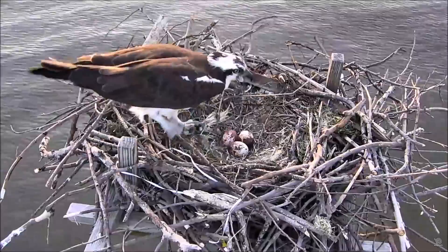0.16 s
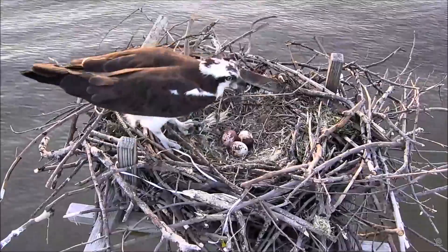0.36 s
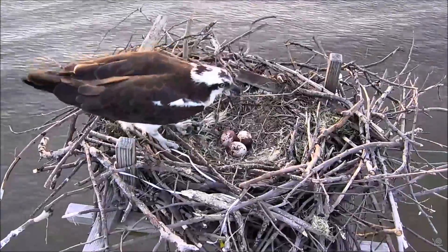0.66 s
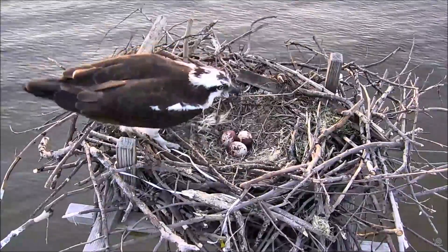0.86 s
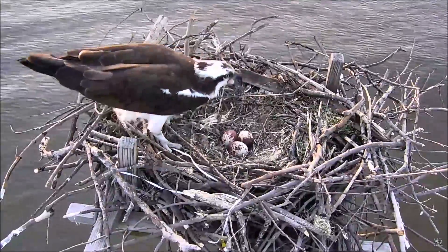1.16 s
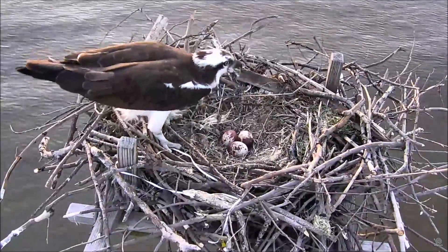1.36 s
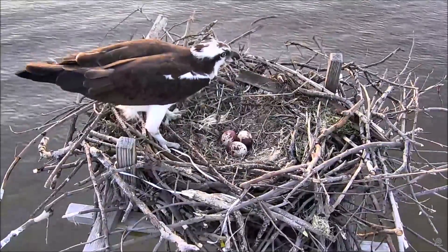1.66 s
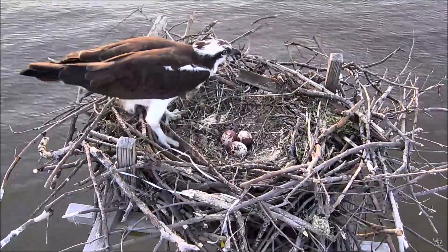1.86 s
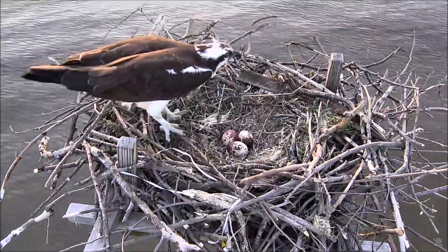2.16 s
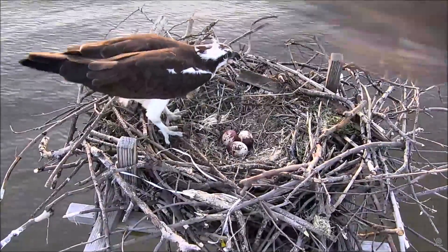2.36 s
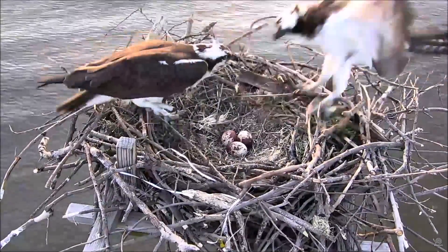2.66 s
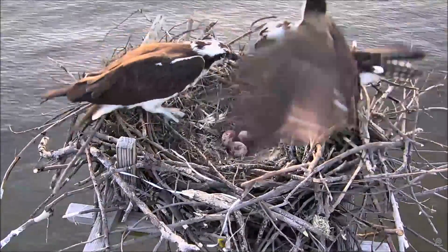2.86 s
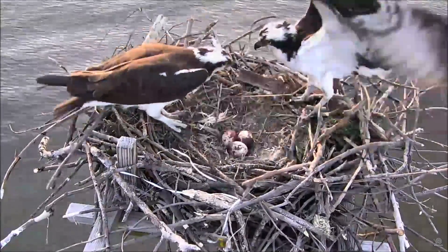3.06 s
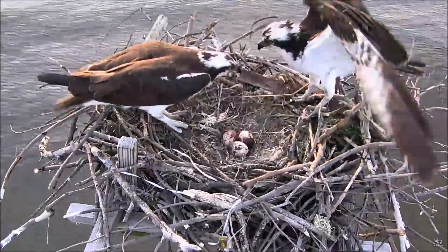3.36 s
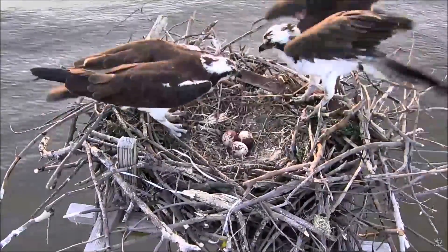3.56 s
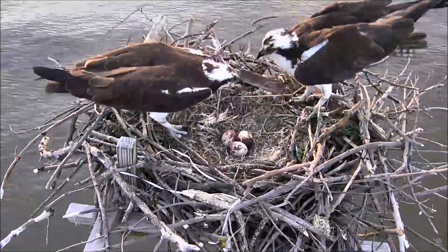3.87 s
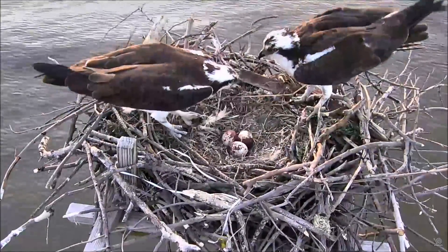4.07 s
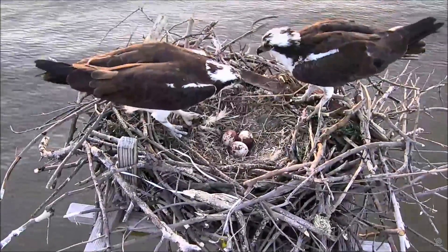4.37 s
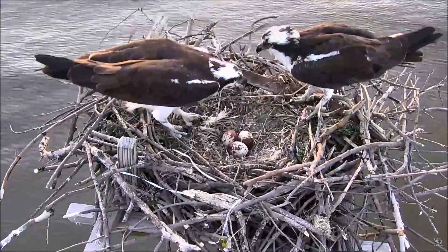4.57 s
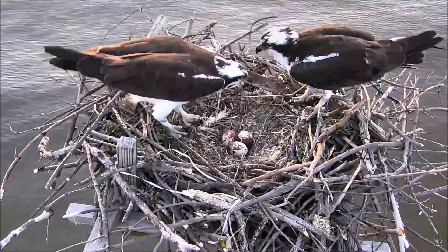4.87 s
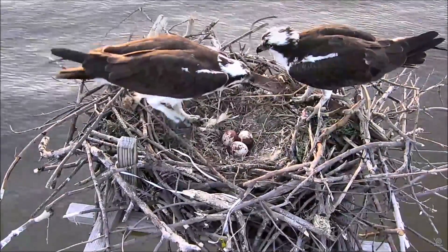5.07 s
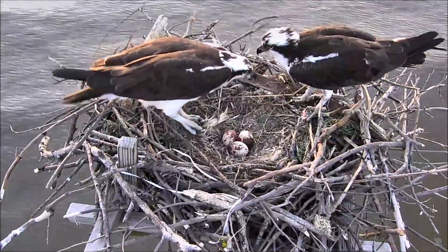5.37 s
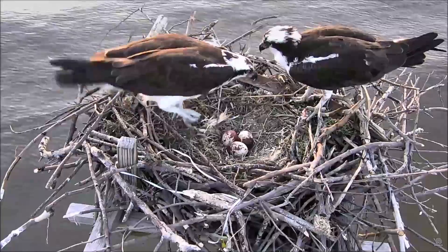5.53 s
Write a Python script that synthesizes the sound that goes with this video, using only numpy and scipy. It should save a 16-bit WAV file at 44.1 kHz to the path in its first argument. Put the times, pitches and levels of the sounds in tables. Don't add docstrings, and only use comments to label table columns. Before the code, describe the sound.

Close, dry outdoor sound at an osprey's stick nest over water. From 0 s the bird whistles piercing chirps about every quarter second: a short level note near 3 kHz, a sagging gap, then a loud sweep down from above 4 kHz and a low, croaky tail. Around 1.5 s the voice turns raspy, and from 1.9 s chirps start with a rising note and flip between registers. Soft feather scraping stirs from about 1.8 to 3 s as the mate flaps in and lands, with a clear twig snap at 2.1 s. From roughly 3.2 s the calls lengthen and slow, calmer and slurred after 3.7 s, held notes edged with airy wheeze, the last at 5.3-5.6 s. A sharp twig snap comes at 5.16 s. Very faint breeze and distant engine hum lie underneath. The small microphone overloads brightly on the loudest notes; brief moments sound thinned and smeared.

```python
import sys
import numpy as np
from scipy import signal
from scipy.fft import rfft, irfft, next_fast_len
from scipy.io import wavfile
from scipy.ndimage import uniform_filter1d, minimum_filter1d, map_coordinates

SR = 44100
rng = np.random.default_rng(int(sys.argv[2]) if len(sys.argv) > 2 else 0)


def wav_out(sig):
    wavfile.write(sys.argv[1], SR, np.round(np.clip(np.atleast_2d(sig).T, -1, 1) * 32767).astype(np.int16))


def undo_db(level):
    steps = np.asarray(level, float) / 20
    return 10 ** steps


N = 251370
CALMER_S = 3.7


def unit(x):
    return x / np.sqrt(np.mean(x ** 2) + 1e-20)


def coloured(x, points):
    m = next_fast_len(N + 8192)
    hz, db = np.transpose(points)
    f = np.fft.rfftfreq(m, 1 / SR)
    gain = undo_db(np.interp(np.log(f + 1), np.log(hz), db))
    return irfft(rfft(x, m) * gain, m)[:N]


def resonate(x, resonances):
    f = np.fft.rfftfreq(N, 1 / SR)
    gain = sum(undo_db(db) / (1 + (2 * (f - hz) / wide) ** 2) for hz, wide, db in resonances)
    return irfft(rfft(x) * gain, N)


def wobble(rate):
    points = rng.standard_normal(int(N * rate / SR) + 4)
    return map_coordinates(points, [np.arange(N) * rate / SR])


def breeze_and_hum():
    # (frequency [Hz], level [dB])
    colour = [(35, -72.5), (60, -34.5), (164, -17.5), (230, -10), (425, -6), (663, -8), (799, -6.5),
              (1500, -19), (1720, -12), (1890, -15), (7850, -28), (15800, -23)]
    # (time [s], level [dB])
    gusts = [(0, -85), (.9, -85), (1.1, -82.5), (1.4, -83.5), (1.7, -85), (2.1, -82.5), (2.8, -83),
             (3.05, -85), (3.9, -82.5), (4.3, -85), (5.05, -83), (5.3, -85.5), (5.7, -84)]
    # (frequency [Hz], level [dB])
    engine = [(274.5, -99), (344.5, -96.5), (409.1, -96)]
    t = np.arange(N) / SR
    hum = 0
    for hz, db in engine:
        level = undo_db(db + 3.5 + 1.2 * wobble(3.4))
        hum = hum + level * np.sin(2 * np.pi * hz * t + wobble(5.9))
    gust_db = np.interp(t, *np.transpose(gusts))
    level = undo_db(gust_db + 1.5 + 1.5 * wobble(5.5) + 1.9 * wobble(15))
    return level * unit(coloured(rng.standard_normal(N), colour)) + hum


def nest():
    # (time [s], level [dB])
    stirring = [(0.0, -90.5), (0.42, -77.5), (.7, -82.5), (1.36, -83), (1.65, -84), (1.78, -73.5),
                (1.9, -80.5), (2.05, -70.5), (2.16, -75.5), (2.38, -73), (2.66, -71.5), (2.93, -73),
                (3.17, -82.5), (3.7, -83.5), (4.9, -87), (5.7, -88.5)]
    # (frequency [Hz], level [dB])
    colour = [(710, -37), (1200, -11.5), (3060, -7.5), (3210, -6), (3850, -8.5), (5290, -2.5), (12000, -27),
              (15600, -60), (22000, -120)]
    # (time [s], peak [dB], pitch [Hz], time to fall 60 dB [s])
    ticks = [
        (0.4176, -52, 5040, 0.014),
        (0.6728, -62, 4002, .011),
        (2.104, -39.5, 4940, .011),
        (2.1106, -46, 5490, 0.013),
        (2.1321, -54, 5530, .011),
        (2.9379, -57, 5840, 0.0095),
        (3.937, -65, 6070, .008),
        (5.1625, -35, 4800, 0.006),
        (5.1635, -39, 6400, .006),
    ]
    grain = undo_db(2.8 * wobble(30) + 2.2 * wobble(300))
    scrape = unit(coloured(unit(grain) * rng.standard_normal(N), colour))
    stir_db = np.interp(np.arange(N) / SR, *np.transpose(stirring)) + 2
    out = np.pad(undo_db(stir_db) * scrape, (0, 900))
    t = np.arange(900) / SR
    for s, db, hz, t60 in ticks:
        level = undo_db(db - 60 * t / t60) * (1 - np.exp(-t / 0.00015))
        ring = np.sin(2 * np.pi * hz * t) + 0.06 * rng.standard_normal(900)
        out[round(s * SR):][:900] += level * ring
    return out[:N]


def wheeze():
    # (start [s], end [s], level [dB])
    wheezes = [(3.49, 3.64, -68), (3.755, 3.8, -65), (3.82, 3.9, -62), (4.03, 4.07, -65), (4.09, 4.17, -63),
               (4.305, 4.495, -62.5), (4.64, 4.765, -63.5), (4.99, 5.09, -69), (5.09, 5.175, -64),
               (5.335, 5.38, -66), (5.43, 5.53, -66)]
    # (centre [Hz], width [Hz], level [dB])
    bands = [(2170, 260, -5), (3050, 300, -1), (3700, 400, -4), (4350, 300, -2), (4750, 200, -9),
             (5130, 300, -1), (5900, 200, -9), (6450, 350, -9), (7600, 900, -18)]
    t = np.arange(N) / SR
    gate = 0
    for start, end, db in wheezes:
        gate = gate + undo_db(db) * np.clip(np.minimum((t - start) / .006, (end - t) / .02), 0, 1)
    once = resonate(rng.standard_normal(N), bands)
    hiss = unit(resonate(once, bands))
    return gate * undo_db(3.2 * wobble(30) + 1.5 * wobble(250)) * hiss


def notes():
    sung = {"grunt": (-25, 0.76, 1.6, 0.0, 0.95, -3.5, -1),
            "pipe": (-15.5, 0.38, 0.5, 0.012, 0.3, -3, -0.5), "fade": (12, 0.5, .9, 0.0, 1.3, 6, -5.5),
            "wisp": (-6.5, 0.2, .9, 0.01, 1.6, 0.0, -0.5), "sigh": (4, .4, 1, 0, 1, -45, -20),
            "crest": (-16, 0.37, 1, -0.03, 1.05, -4, -0.5),
            "climb": (-27.5, .65, 0.9, -0.05, 0.85, -1.5, -11),
            "drop": (-23.5, 0.55, 0.55, 0.024, 1.05, 1.5, -1), "flip": (-14, 0.63, 0.5, 0.02, 1.13, -1, 1),
            "settle": (-23.5, 0.27, 1.1, 0.035, 1.76, 1, 2.5),
            "slide": (-12, 0.2, 1.5, 0.0, 0.77, 0.0, -6.5), "tail": (0, 0.3, 1.3, 0.03, 0.78, 0.73, 0.5),
            "hold": (-17.5, 0.2, 0.35, 0.0, 0.5, 2, 0.5), "bend": (0, 0.68, 1, 0.01, 1.1, 0.12, 0.0)}
    # (time [s], peak [dB])
    grunts = [(.013, -59), (.241, -65), (.479, -43), (0.712, -45.5), (.941, -41), (1.188, -70),
              (1.426, -52.5), (1.676, -52), (1.924, -67), (2.689, -44.5), (3.212, -59), (3.468, -59),
              (3.716, -64), (4.266, -75), (4.595, -74.5), (4.95, -68), (5.299, -74)]
    # (time [s], peak [dB], pitch [Hz])
    pipes = [
        (0.02, -38, 2996),
        (.247, -39, 3028),
        (.492, -39.5, 3000),
        (0.725, -38, 3126),
        (.955, -36, 3112),
        (1.198, -39.5, 3050),
        (1.438, -40, 3050),
        (1.689, -39.5, 3000),
        (2.434, -39.5, 3000),
    ]
    # (time [s], peak [dB])
    climbs = [(1.929, -35), (2.182, -36), (2.701, -37), (2.957, -36), (3.219, -34.5), (3.474, -36.5),
              (3.725, -37.5), (3.999, -41.5), (4.276, -40.5), (4.605, -43.5), (4.963, -38.5), (5.309, -39)]
    # (time [s], level [dB], start [Hz], end [Hz])
    fades = [(.062, -58, 2980, 2263), (.288, -59.5, 2975, 2315), (.528, -64.5, 2962, 2300),
             (.768, -60.5, 3050, 2607), (.995, -56.5, 3050, 2400), (1.234, -60, 3000, 2550),
             (1.473, -58, 2950, 2548), (1.72, -57.5, 2879, 2558), (1.963, -56, 3418, 2400),
             (2.228, -58, 3298, 2500), (2.469, -61.5, 2960, 2400), (2.74, -62.5, 3380, 2432),
             (2.998, -65.5, 3500, 2400), (3.268, -56, 3606, 2790), (4.767, -49, 2850, 2592)]
    # (time [s], peak [dB], start [Hz], end [Hz])
    drops = [(.094, -36.5, 4124, 3297), (.312, -32.5, 4590, 3897), (.326, -31.5, 4087, 3267),
             (.55, -34.5, 4500, 3900), (.561, -31.5, 3900, 3107), (.797, -41, 4310, 3396),
             (1.028, -40, 4900, 4500), (1.033, -30.5, 4350, 2950), (1.258, -40, 4500, 4204),
             (1.272, -32.5, 4336, 2813), (1.522, -34, 4500, 3035), (1.77, -37, 4510, 4150),
             (1.779, -30.5, 4050, 3182), (1.803, -34.5, 4250, 3273), (2.023, -30.5, 4215, 3050),
             (2.053, -34, 4357, 3157), (2.262, -45.5, 4600, 4396), (2.27, -31, 4320, 2810),
             (2.528, -49.5, 4660, 4390), (2.541, -34, 4330, 3500), (2.785, -51, 4640, 4460),
             (2.794, -30.5, 4280, 3050), (2.821, -36, 4000, 3298), (3.043, -46, 4710, 4394),
             (3.056, -30.5, 4334, 3185), (3.084, -35, 4145, 3600), (3.299, -33, 4380, 2990),
             (3.355, -34, 4300, 3520), (3.61, -32.5, 4110, 3490), (3.878, -36, 4035, 3495),
             (4.146, -37.5, 4020, 3500), (4.473, -37.5, 3940, 3550)]
    # (time [s], peak [dB], start [Hz], end [Hz])
    flips = [(1.548, -35.5, 3050, 3460), (1.794, -34.5, 3785, 3883), (2.044, -34.5, 3680, 3985),
             (2.213, -43.5, 3916, 3609), (2.288, -38, 3528, 4303), (2.302, -38, 3960, 3978),
             (2.311, -36, 3960, 3802), (2.559, -33, 3300, 3034), (2.727, -45, 3800, 3572),
             (2.806, -38, 3495, 4183), (2.977, -45, 3837, 3900), (3.07, -33.5, 3880, 4293),
             (3.245, -40.5, 3900, 4100), (3.281, -44.5, 4095, 4540), (3.33, -46, 3620, 4407),
             (3.336, -34.5, 4380, 4365), (3.493, -37.5, 3600, 4014), (3.569, -42.5, 2710, 3982),
             (3.583, -35.5, 4264, 4320), (3.741, -36.5, 3580, 3926), (4.009, -40.5, 3540, 3954),
             (4.289, -39.5, 3614, 3857), (4.416, -36, 4050, 4500), (4.613, -41, 3600, 3994),
             (4.999, -43, 3724, 3575), (5.105, -34, 3800, 3828), (5.34, -40.5, 3670, 3566)]
    # (time [s], peak [dB], start [Hz], end [Hz])
    settles = [
        (.105, -36.5, 2960, 2560),
        (.346, -34.5, 2980, 2620),
        (.581, -37, 3060, 2620),
        (.811, -32.5, 3120, 2700),
        (1.052, -32.5, 3030, 2720),
        (1.295, -34.5, 3080, 2620),
        (1.564, -34.5, 3060, 2650),
    ]
    # (time [s], peak [dB], start [Hz], end [Hz])
    slides = [(1.827, -31.5, 3150, 2505), (2.072, -32, 3150, 2414), (2.318, -38.5, 3350, 2400),
              (2.57, -32.5, 3192, 2775), (2.6, -43, 2808, 2506), (2.838, -39, 3098, 2457),
              (3.101, -33, 3276, 2700), (3.12, -43.5, 2700, 2486), (3.37, -34.5, 3338, 2627),
              (3.628, -37.5, 3193, 2465), (3.891, -38.5, 3183, 2564), (4.162, -39.5, 3129, 2560),
              (4.487, -37, 3168, 2670), (4.749, -38, 3176, 2895), (5.158, -35.5, 3270, 2498),
              (5.494, -31.5, 3050, 2616)]
    # (time [s], peak [dB], start [Hz], end [Hz])
    holds = [
        (3.541, -57, 2873, 2830),
        (5.016, -37.5, 3255, 3125),
        (5.373, -42, 3150, 3076),
    ]
    # (time [s], start level [dB], peak [dB], end [Hz])
    bends = [(3.504, -41, -43, 4164), (3.52, -43, -46.5, 3750), (3.799, -48, -47, 4170),
             (3.82, -47, -42, 4360), (3.841, -36.5, -34.5, 4428), (4.067, -45, -41, 4266),
             (4.105, -35, -33.5, 4310), (4.318, -50.5, -38.5, 3422), (4.362, -41.5, -40, 3867),
             (4.449, -39.5, -36, 3950), (4.629, -57, -41.5, 4050), (4.688, -49, -43.5, 3730),
             (4.71, -39.5, -37.5, 3710), (5.05, -38.5, -37.5, 3150), (5.08, -36.5, -36, 3360),
             (5.421, -47, -43, 3686), (5.444, -40, -38.5, 3637)]
    # (time [s], level [dB])
    tails = [(.145, -51), (.389, -52), (0.624, -54), (.858, -53.5), (1.089, -47), (1.338, -53),
             (1.597, -50), (1.85, -55.5), (2.612, -55), (2.868, -63), (3.127, -57), (3.389, -52),
             (5.527, -53.5)]
    # (time [s], peak [dB])
    wisps = [
        (1.016, -59.5),
        (1.25, -49.5),
        (1.495, -55.5),
        (1.738, -55),
        (2.004, -55),
        (2.25, -55),
        (2.497, -59),
        (2.778, -62),
        (3.028, -59),
    ]
    # (time [s], peak [dB], start [Hz], end [Hz])
    crests = [
        (3.755, -36.5, 4253, 4174),
        (4.024, -37, 4290, 4120),
        (4.654, -38.5, 3920, 3400),
    ]
    # (time [s], level [dB], start [Hz], end [Hz])
    sighs = [
        (4.506, -63, 2594, 2050),
        (4.534, -74, 1797, 1603),
        (5.543, -69.5, 1880, 1730),
    ]
    ends = [0.158, 0.406, 0.64, 0.875, 1.112, 1.352, 1.615, 1.865, 1.992, 2.102, 2.243, 2.347, 2.628, 2.76,
            2.89, 3.02, 3.143, 3.403, 3.648, 3.911, 4.181, 4.554, 4.787, 5.197, 5.569]
    kinds = dict(fade=fades, drop=drops, flip=flips, hold=holds, settle=settles, slide=slides,
                 crest=crests, sigh=sighs)
    # (start Hz, end Hz)
    kinds["grunt"] = [(s, db, 2074, 2182) for s, db in grunts]
    kinds["climb"] = [(s, db, 2740, 3193) for s, db in climbs]
    kinds["tail"] = [(s, db, 2065, 1725) for s, db in tails]
    kinds["wisp"] = [(s, db, 5376, 4660) for s, db in wisps]
    kinds["pipe"] = [(s, db, 0.97 * hz, hz) for s, db, hz in pipes]
    rows = []
    for kind, table in kinds.items():
        start_db, *manner = sung[kind]
        rows += [[s, db + start_db, db, hz0, hz1, *manner, 0] for s, db, hz0, hz1 in table]
    bend_ease = 0.45
    rows += [[s, start, db, np.nan, hz, *sung["bend"][1:], bend_ease] for s, start, db, hz in bends]
    rows += [[s, -90, -200, 2500, 2500, .5, 1, 0, 1, 0, 0, 0] for s in [-1, *ends, 9]]
    rows = np.array(sorted(rows))
    rows[1:, 3] = np.where(np.isnan(rows[1:, 3]), rows[:-1, 4], rows[1:, 3])
    return rows


def breath_and_pitch():
    rows, t = notes(), np.arange(N) / SR
    k = np.searchsorted(rows[:, 0], t, "right") - 1
    s, start_db, peak_db, hz0, hz1, share, full, bow, late, lift_db, half_db, ease = rows[k].T
    next_s, next_db = rows[k + 1, 0], rows[k + 1, 1]
    u = (t - s) / (next_s - s)
    rising = u < share
    swell = np.sin(np.pi / 2 * np.where(rising, u / share, (1 - u) / (1 - share))) ** full
    level = undo_db(peak_db) * swell + undo_db(np.where(rising, start_db, next_db)) * (1 - swell)
    level = abs(uniform_filter1d(level * (peak_db > -150), size=30))
    way = u ** late - ease * np.sin(2 * np.pi * u) / (2 * np.pi)
    arch = 1 + 4 * np.clip(bow, -.01, .06) * u * (1 - u)
    pitch = (hz0 + (hz1 - hz0) * way) * arch
    quick, slurred = uniform_filter1d(pitch, size=30), uniform_filter1d(pitch, size=200)
    pitch = np.where(t < CALMER_S, quick, slurred)
    crisp = (t < 4.9) | (minimum_filter1d(pitch, size=500) < 2750)
    pitch = np.where(crisp, pitch, uniform_filter1d(pitch, size=400))
    return level, pitch, lift_db * u, half_db


def osprey():
    # (pitch [Hz], 2nd [dB], 3rd [dB], half-way lines [dB])
    overtones = [(1988, 5.5, -12, -38), (2400, -11, -29, -31), (2700, -14, -39.5, -24),
                 (3000, -16.5, -42, -19), (3150, -24.5, -51.5, -28), (3350, -28, -56.5, -40),
                 (3900, -26.5, -54.5, -54.5), (4200, -39, -57, -58), (4500, -48.5, -58.5, -60)]
    # (frequency [Hz], level [dB])
    breath = [(1200, -63.5), (1800, -16.5), (2200, -5), (3000, 0), (4500, 3), (5500, -7), (7000, -10),
              (9000, -22.5), (11000, -54.5)]
    # (centre [Hz], width [Hz], level [dB])
    throat = [(2170, 230, -1), (3050, 280, 1), (3750, 560, -3.5), (4600, 270, -4.5), (5140, 200, 1.5),
              (6240, 400, -2), (7800, 5800, -7.5)]
    # (time [s], roughness [0 up])
    strain = [
        (0, 0.2),
        (1.5, 0.51),
        (1.58, 1.63),
        (1.66, .8),
        (3.1, 0.92),
        (3.7, 0.22),
        (5.7, 0.11),
    ]
    # lower below, upper above [Hz]
    register_hz = (3150, 3500)
    t = np.arange(N) / SR
    level, pitch, lift_db, half_db = breath_and_pitch()
    upper = np.interp(pitch, register_hz, [0, 1])
    squeak = np.interp(pitch, (4100, 4900), [0, 1])
    rasp = np.interp(t, *np.transpose(strain)) * (0.33 + .7 * upper)
    flutter = np.sin(2 * np.pi * np.cumsum(380 * (1 + .2 * wobble(30))) / SR) * abs(wobble(40))
    rough_db = rasp * (2.5 * flutter + 0.87 * wobble(500) - 2.0 * wobble(350) ** 2)
    strained = level * undo_db(rough_db)
    loudest = undo_db(-28.5)
    strained = strained / (1 + (strained / loudest) ** 4) ** (1 / 4) / (level + 1e-9)
    rasp = rasp + squeak ** 3 * 1.5
    phase = 2 * np.pi * np.cumsum(pitch * (1 + 0.0045 * wobble(400))) / SR
    phase = phase + 0.41 * rasp * wobble(900)
    hz, *columns = np.transpose(overtones)
    second, third, half = [undo_db(np.interp(pitch, hz, db) + 3.7 * wobble(40)) for db in columns]
    tone = np.sin(phase) * strained
    tone += second * undo_db(lift_db) * np.sin(2 * phase) + third * np.sin(3 * phase)
    halves = 0.12 * np.sin(phase / 2) + np.sin(3 * phase / 2) + 0.35 * np.sin(5 * phase / 2)
    tone += half * undo_db(half_db) * halves
    leak_db = -28 - 7 * (t > CALMER_S) - 1.5 * (1 - upper) + 4 * squeak
    hoarse = undo_db(leak_db + 3 * wobble(25) + 1.8 * wobble(200))
    hiss = unit(resonate(coloured(rng.standard_normal(N), breath), throat))
    return level * tone + hoarse * level ** 0.77 * undo_db(-5.0) * hiss


def echoes(x):
    t = np.arange(SR // 8) / SR
    tail = rng.standard_normal(len(t)) * undo_db(-60 * t / 0.064)
    return signal.fftconvolve(x, tail / np.linalg.norm(tail))[:N]


def scene():
    bird = osprey() + wheeze()
    return (bird + undo_db(-18.5) * echoes(bird) + nest() + breeze_and_hum())[None]


def capsule(x):
    # (frequency [Hz], level [dB])
    crackle = [(30, -60), (150, -60.5), (500, -60), (1500, -63), (6500, -53), (8500, 4), (11000, 6),
               (13000, 3), (16000, 3)]
    # (frequency [Hz], level [dB])
    thump_colour = [(20, -30.5), (60, -14.5), (150, -2.5), (600, -1), (1300, -30), (3000, -120)]
    # (multiple of the pitch, level [dB])
    bent_overtones = [(2, -42), (3, -14), (4, -21), (5, -25)]
    bend, steep = undo_db(-31), 9
    whistle_band = [(20, -60), (1500, -60), (2300, 0), (5000, 0), (6000, -30), (22000, -60)]  # (Hz, dB)
    swing = signal.hilbert(coloured(x, whistle_band))
    drive = abs(uniform_filter1d(abs(swing), size=60)) / bend
    bent = drive ** steep / (1 + drive ** steep)
    overtones = sum(undo_db(db) * np.cos(k * np.angle(swing)) for k, db in bent_overtones)
    overtones = overtones + undo_db(-24) * rng.standard_normal(N)
    shaved = bend * bent * overtones + 0.12 * x ** 2
    thump = undo_db(-56) * coloured(abs(x / bend) ** 3, thump_colour)
    return x - coloured(shaved, crackle) + thump


def band_dropouts(x):
    # (start [s], length [s], low edge [Hz], smear [0-1])
    dropouts = [(1.557, .058, 1400, 0.55), (0.739, .03, 29.9, 0.13), (.89, 0.013, 301, 0.14),
                (.96, 0.023, 30, 0.03), (1.128, .014, 303, 0), (1.926, .04, 29.92, 0),
                (2.235, .012, 2022, 0), (2.873, .012, 300.5, 0.02), (2.983, 0.018, 1500, 0.34),
                (3.064, .014, 1800, 0.24), (2.44, 0.041, 29.95, 0.01), (3.291, .055, 29.9, 0),
                (4.021, 0.14, 30, 0), (4.433, .014, 1800, 0.03), (4.756, 0.013, 1516, 0),
                (4.966, .012, 1794, 0.28)]
    t, f = np.arange(N) / SR, np.fft.rfftfreq(N, 1 / SR)
    z = signal.stft(x, nperseg=2048)[2]
    kept = abs(z) > undo_db(-37) * abs(z).max(axis=0)
    lines = abs(z) * kept * np.exp(2j * np.pi * rng.random(z.shape))
    smeared = signal.istft(lines, nperseg=2048)[1][:N]
    spectrum, out = rfft(x), x
    for s, length, low_hz, smear in dropouts:
        edges = irfft(spectrum * ((f < low_hz) | (f > 9300)), N)
        on = np.clip(np.minimum(t - s, s + length - t) / .004 + .5, 0, 1)
        lost = (1 - undo_db(-18)) * edges + smear * (x - edges - 1.84 * smeared)
        out = out - on * lost
    return out


def top_cut(x):
    return signal.sosfilt(signal.butter(12, 15960, fs=SR, output="sos"), x)


def record(dry):
    heard = band_dropouts(capsule(dry[0]))
    return top_cut(heard[None])


dry = scene()
out = record(dry)
wav_out(out)
```